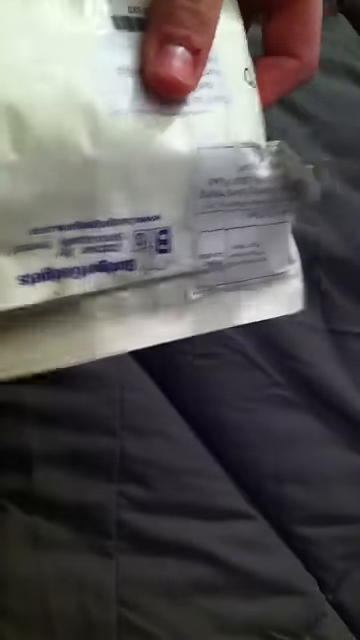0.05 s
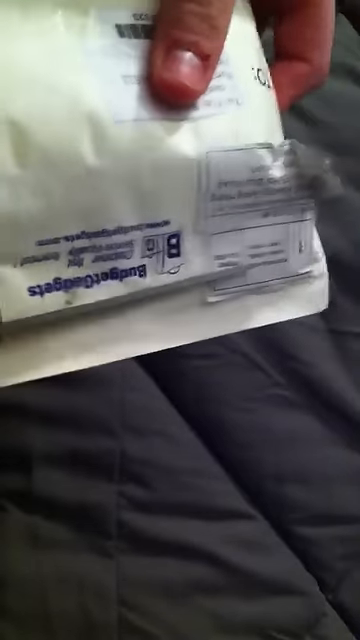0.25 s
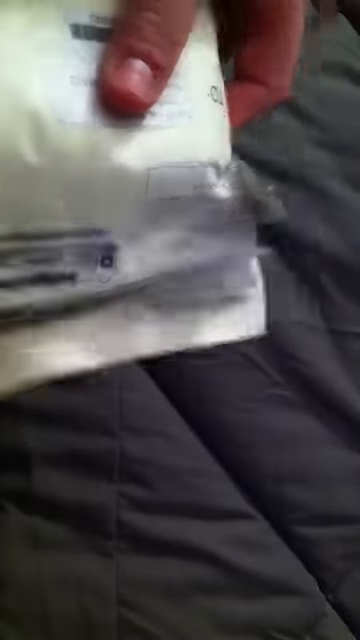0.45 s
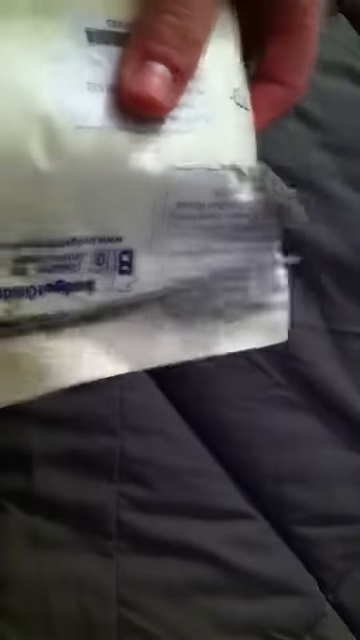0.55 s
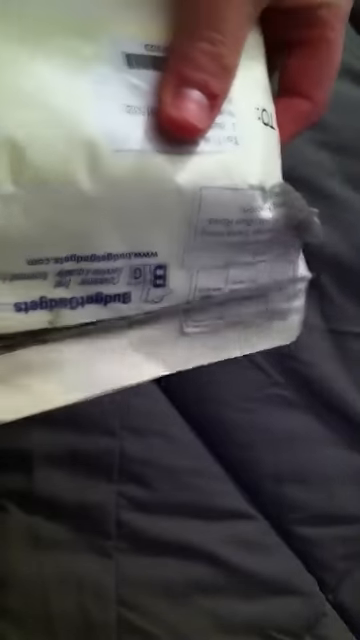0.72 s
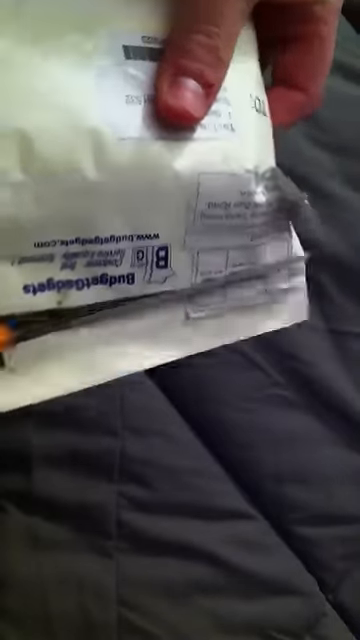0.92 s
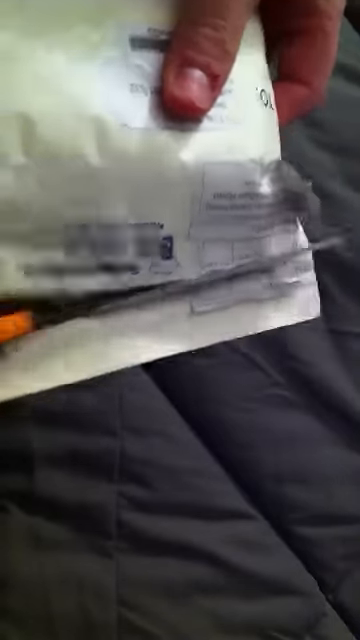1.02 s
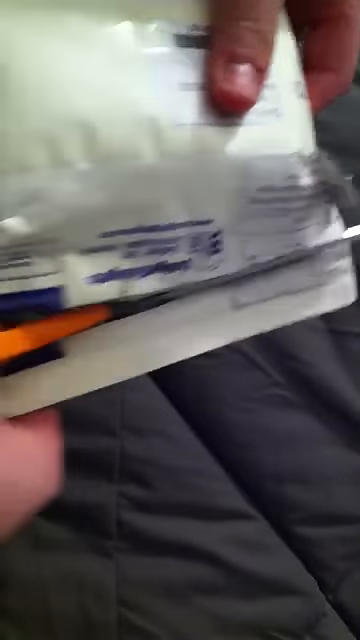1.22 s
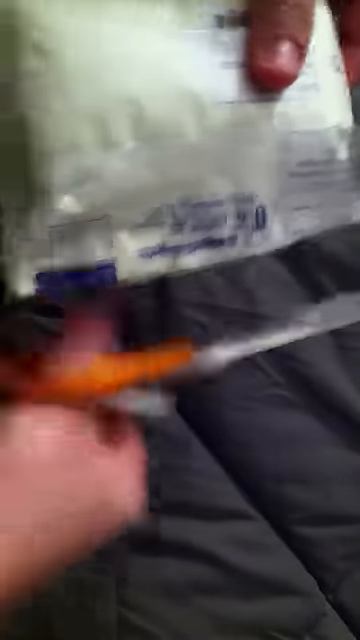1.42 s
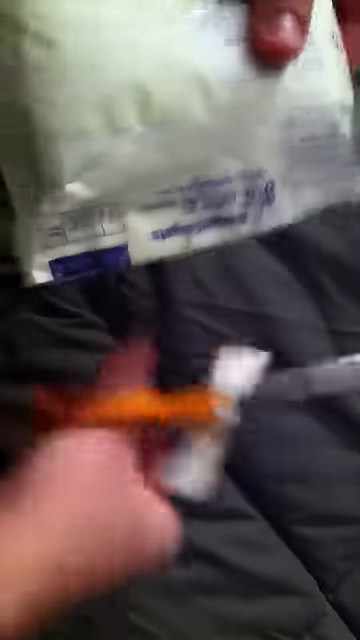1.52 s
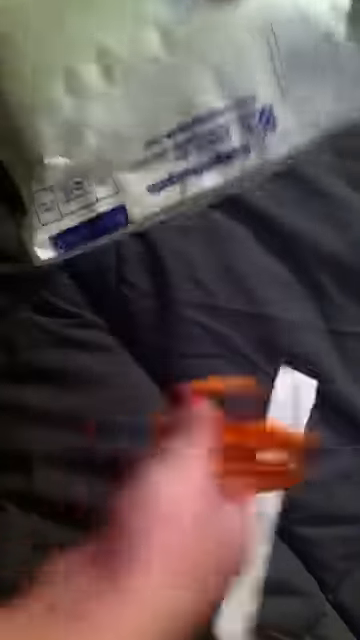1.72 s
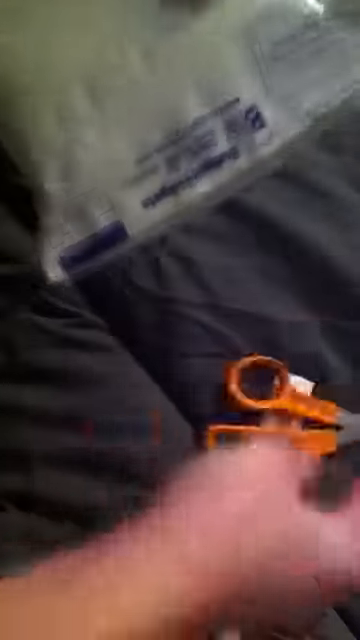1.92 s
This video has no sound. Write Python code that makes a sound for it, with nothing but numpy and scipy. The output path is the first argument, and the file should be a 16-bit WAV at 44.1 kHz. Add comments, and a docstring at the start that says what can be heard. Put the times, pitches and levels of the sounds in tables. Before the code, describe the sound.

Close crinkling of a padded envelope being handled and pulled open, with small sharp snaps.

```python
"""A padded paper and plastic envelope is handled close up, over a bed, and pulled open along one edge.
Creases buckle in quick avalanches of tiny fractures, single folds snap, and the sheet hisses as it
slides under the fingers. The hollow pouch thumps softly over a low rustle of hands and bedding.
A small furnished room adds a short tail; a faint hiss lies behind."""
import sys
import numpy as np
from scipy import signal
from scipy.fft import rfft, irfft
from scipy.io import wavfile

SR = 44100
rng = np.random.default_rng(int(sys.argv[2]) if len(sys.argv) > 2 else 0)


def transcribe(u):
    """Save the signal u as a 16-bit wav file named by the first command-line argument.

    u: samples, shape (n,) or (channels, n), limited to [-1, 1]; the rate is SR.
    q: integer samples, one column per channel.
    """
    v = np.clip(np.atleast_2d(u).T, -1, 1)
    q = np.round(v * 32767).astype(np.int16)
    wavfile.write(sys.argv[1], SR, q)


N = 85995
TOP_HZ = 15900


def undb(db):
    """Decibels to gain."""
    return 10 ** (np.asarray(db) / 20)


def unit(x):
    """Scale to unit energy."""
    return x / np.sqrt(np.sum(x ** 2) + 1e-18)


def colour(x, points, bass_db=0, treble_db=0, bass_hz=490, treble_hz=6200, size=2048):
    """Minimum-phase filter through (Hz, dB) points, with bass and treble shelves."""
    f = np.maximum(np.fft.rfftfreq(size, 1 / SR), 1)
    hz, db = np.array(points, float).T
    db = np.interp(np.log(f), np.log(hz), db)
    db = db + bass_db / (1 + (f / bass_hz) ** 4) + treble_db / (1 + (treble_hz / f) ** 4)
    cepstrum = irfft(np.log(undb(db)))
    cepstrum[1:size // 2] *= 2
    cepstrum[size // 2 + 1:] = 0
    return signal.fftconvolve(x, irfft(np.exp(rfft(cepstrum))))[:len(x)]


def steady(x, points, treble_db=0):
    """Colour, then scale to unit rms."""
    return unit(colour(x, points, treble_db=treble_db)) * np.sqrt(len(x))


def soften(x, hz):
    """Second-order low-pass."""
    return signal.sosfilt(signal.butter(2, min(hz, TOP_HZ), fs=SR, output="sos"), x)


def grains(n, per_s, spread_db, limit_sigma=1.73):
    """Random clicks of either sign and capped log-normal size."""
    size_db = spread_db * np.minimum(rng.standard_normal(n), limit_sigma)
    fires = rng.random(n) < per_s / SR
    return fires * np.sign(rng.standard_normal(n)) * undb(size_db)


def ring(hz, ring_s, size=4096):
    """A patch of sheet flips over and rings down."""
    t = np.arange(size) / SR
    displacement = np.exp(-t / max(ring_s, 1 / SR)) * np.sin(2 * np.pi * min(hz, TOP_HZ) * t)
    return np.diff(displacement, prepend=0)


def add(out, x, start_s, db, window_s=0.004):
    """Mix in one event; db is its rms with the energy spread over window_s."""
    i = max(int(round(start_s * SR)), 0)
    part = unit(x)[:max(N - i, 0)] * undb(db) * np.sqrt(window_s * SR)
    out[i:i + len(part)] += part


def background_hiss(rms_db=-66.5):
    """Faint, steady coloured noise."""
    # Each row: frequency in Hz, gain in dB.
    spectrum = [(30, -21), (150, 3.5), (400, -10.5), (1000, -7.5), (2500, -3.5), (4500, -4.5), (9000, -9),
                (16000, -12)]
    return undb(rms_db) * steady(rng.standard_normal(N), spectrum)


def room(x, send_db=-16.5, t60_s=0.22, delay_s=0.00373):
    """Short diffuse tail of a furnished bedroom."""
    # Each row: frequency in Hz, gain in dB.
    response = [(40, -9), (200, 1.5), (400, 7.5), (900, 1), (2000, 1), (4200, -2), (8000, 0.5),
                (16000, -13)]
    t = np.arange(SR // 2) / SR
    tail = rng.standard_normal(len(t)) * np.exp(-np.log(1000) * t / t60_s) * (t > delay_s)
    return undb(send_db) * colour(signal.fftconvolve(x, unit(tail))[:N], response)


def rustle():
    """Low, hollow rubbing of hands and bedding on the pouch."""
    # Each row: time in seconds, level in dB.
    contour = [(0, -63.5), (.12, -62), (.17, -67), (.3, -47.5), (.42, -75), (.52, -63), (.66, -58.5),
               (.75, -67), (.95, -71), (1.17, -62.5), (1.24, -63), (1.35, -60), (1.5, -62), (1.54, -65.5),
               (1.61, -64.5), (1.68, -73.5), (1.91, -70), (1.94, -53)]
    # Each row: frequency in Hz, gain in dB.
    pouch_response = [(30, -27), (90, -18), (160, -7.5), (250, -3), (380, 3), (560, -10.5), (1200, -12.5),
                      (4000, -39.5)]
    times_s, levels_db = np.array(contour).T
    gain = undb(np.interp(np.arange(N) / SR, times_s, levels_db))
    return gain * steady(rng.standard_normal(N), pouch_response)


def thumps(padding_hz=1300, lowest_hz=130):
    """Pops of the air-filled pouch, dulled by its padding; it is too small to radiate deep bass."""
    # Each row: start in seconds, level before the bass cut in dB, pitch in Hz, decay in seconds.
    pops = [(0.219, -45, 262, 0.0023), (0.5063, -35, 346, 0.0021), (.639, -43, 800, .005),
            (.739, -48.5, 189, 0.0046), (.846, -37, 340, .0035), (1.077, -51.5, 222, 0.0064),
            (1.3915, -30.5, 343, 0.003), (1.569, -51.5, 370, 0.013), (1.738, -38.5, 844, 0.001),
            (1.746, -52.5, 777, 0.013), (1.899, -58.5, 300, 0.0035)]
    out = np.zeros(N)
    for start_s, db, hz, ring_s in pops:
        add(out, soften(ring(hz, ring_s), padding_hz), start_s, db)
    return signal.sosfilt(signal.butter(2, lowest_hz, "high", fs=SR, output="sos"), out)


def slides(flicker_db=1.0, flicker_per_s=260):
    """Stick-slip grains swell and fade with each stroke and flicker as the surface catches."""
    # Each row: time of fastest slip in seconds, level in dB, rise and fall in seconds, treble in dB.
    strokes = [(.005, -58.5, .02, 0.025, -17), (0.062, -48.5, 0.015, 0.033, 7),
               (.113, -43.5, 0.033, 0.018, 4), (0.237, -46, 0.025, 0.029, -10),
               (0.331, -43, 0.011, 0.017, 2), (.477, -46, 0.014, 0.022, -1), (.516, -38, 0.0082, 0.034, 4),
               (.585, -34.5, 0.017, 0.02, 8.5), (.66, -45, 0.027, 0.036, -6.5),
               (.731, -38, 0.021, 0.015, 6), (0.791, -53, .02, 0.0088, 3), (0.873, -49, 0.021, 0.018, 9),
               (.988, -56, 0.015, 0.011, -3), (1.032, -47, 0.014, .018, -1.5), (1.07, -51, 0.022, 0.042, 0),
               (1.157, -42, 0.025, .019, 3.5), (1.31, -58.5, 0.044, 0.13, -2),
               (1.42, -47, 0.0071, 0.0052, -4), (1.388, -51.5, 0.0088, 0.0074, -2),
               (1.466, -50.5, 0.0046, 0.027, 2), (1.61, -65, 0.058, 0.056, 10),
               (1.695, -56, 0.013, 0.0089, 10), (1.779, -60.5, 0.037, 0.023, 6.5)]
    # Each row: frequency in Hz, gain in dB.
    friction_spectrum = [(35, -60.5), (60, -39), (330, -6), (553, -3.5), (607, -5.5), (803, 1.5),
                         (1220, -3.5), (1440, -0.5), (1820, -8.5), (2090, -1.5), (2580, -6.5), (4420, 0.5),
                         (5860, -9.5), (8710, -6), (12100, -13.5), (13600, -13), (16000, -21)]
    out, t = np.zeros(N), np.arange(N) / SR
    slips = grains(N, per_s=16000, spread_db=4)
    for peak_s, db, rise_s, fall_s, treble_db in strokes:
        speed = np.exp(-0.5 * ((t - peak_s) / np.where(t < peak_s, rise_s, fall_s)) ** 2)
        friction = steady(np.roll(slips, rng.integers(N)), friction_spectrum, treble_db)
        out += undb(db) * speed * friction
    catches = np.interp(t * flicker_per_s, np.arange(N), rng.standard_normal(N))
    return out * undb(flicker_db * catches)


def snaps(shiver_db=-6.5, shiver_s=0.0019, cutoff_ratio=2.2, size=4096):
    """A single fold flips sharply, then the sheet shivers briefly."""
    # Each row: start in seconds, level in dB, pitch in Hz, decay in seconds.
    folds = [(.1478, -51.5, 8000, .0001), (.151, -42, 1500, 0.00023), (0.214, -43, 5470, 0.00014),
             (0.2443, -30.5, 2800, 0.000063), (0.2834, -26, 5230, 0.00015), (0.2998, -18, 4200, 0.00031),
             (0.433, -55.5, 5500, 0.00007), (.6381, -28, 2220, 0.00012), (.669, -34.5, 3400, 0.00011),
             (0.6724, -38.5, 5500, 0.000046), (0.7354, -34, 3080, 0.00012), (0.8253, -20.5, 1180, 0.00076),
             (.849, -26, 2050, 0.00018), (1.3248, -45.5, 1650, 0.00033), (1.4452, -28, 3820, 0.00087),
             (1.4544, -20.5, 4200, 0.000075), (1.482, -37, 10700, 0.00015)]
    out, t = np.zeros(N), np.arange(size) / SR
    for start_s, db, hz, ring_s in folds:
        push = undb(shiver_db) * unit(rng.standard_normal(size) * t * np.exp(-2 * t / shiver_s))
        push[0] += 1  # the flip
        snap = signal.fftconvolve(push, ring(hz, ring_s))[:size]
        add(out, soften(snap, cutoff_ratio * hz), start_s, db)
    return out


def crumples(size=4096):
    """Each crease gives way in an avalanche of fractures that builds up and dies away."""
    # Each row: peak time in seconds, level in dB, rise and fall in seconds, bass and treble in dB.
    creases = [(0.0515, -41.5, 0.00092, 0.0015, -11, 15.5), (.119, -37, 0.0016, 0.0021, 8, 7.5),
               (.2158, -39, 0.0021, 0.0022, 10, 4), (0.2433, -18, 0.0003, 0.0033, -4, -1),
               (.2518, -23, 0.006, .003, -7, 1), (0.256, -20.5, 0.00044, 0.0025, -3, -1),
               (.261, -24, .001, 0.0017, 3, 0.5), (.27, -22.5, 0.0063, 0.011, 1, 0),
               (0.279, -23, .0025, 0.0012, 12, 13), (0.2828, -16.5, 0.00035, 0.0006, -3, 1.5),
               (0.2858, -18.5, 0.00086, 0.00176, -5, 2), (.3006, -17, 0.0022, 0.003, 5.5, -0.5),
               (.3033, -24.5, 0.00023, 0.0033, 7, 10.5), (0.3074, -28, 0.0012, 0.0011, -8, 2),
               (0.3382, -33, 0.0014, 0.0013, 0, 3), (0.4473, -48, 0.0011, 0.0052, 8, -17),
               (0.5041, -25.5, 0.00068, 0.0049, -0.5, 10), (.7387, -38.5, 0.0011, 0.0034, 25, 14),
               (0.7659, -38, .002, 0.0032, 10, 5.5), (0.819, -30, 0.00086, 0.0037, 0, -3),
               (0.8252, -20, 0.0028, 0.0048, 5.5, 10.5), (.8325, -29, 0.0024, 0.0028, -12, 11),
               (0.8429, -26, 0.00047, 0.001, 13, 10), (0.848, -20.5, 0.0026, 0.0018, -5.5, -7.5),
               (0.8492, -21.5, 0.0021, 0.00096, 2.5, 4.5), (.859, -35.5, 0.0026, 0.002, 18, 7),
               (1.158, -37.5, .003, 0.0029, 11, 15), (1.1944, -52.5, 0.00042, 0.0011, 13, -11),
               (1.3917, -28.5, 0.0018, 0.0017, 0.5, -1), (1.394, -29.5, 0.00047, 0.0033, 10.5, 1),
               (1.4051, -35.5, 0.0015, 0.0021, 15, 5.5), (1.446, -32, 0.0025, 0.0011, 5, 10),
               (1.45, -31.5, 0.0012, 0.0016, 12, 7.5), (1.456, -38.5, 0.0011, 0.001, 21, -11),
               (1.705, -50.5, 0.0026, 0.0026, 6, 9.5), (1.852, -53.5, 0.0011, 0.0049, 10, -1),
               (1.9485, -36, 0.0057, 0.0033, 8, 4.5)]
    # Each row: frequency in Hz, gain in dB.
    paper_response = [(30, -20), (110, -25.5), (230, -6.5), (400, 0.5), (560, -6), (800, 1.5), (1300, -0.5),
                      (2000, -0.5), (2400, -4), (3000, -2), (4300, -1.5), (5300, -6), (6000, -10),
                      (7500, -15), (8700, -9), (10500, -12.5), (12000, -21), (14000, -16.5), (16000, -24)]
    out = np.zeros(N)
    t = (np.arange(size) - size // 4) / SR  # zero at the peak
    for peak_s, db, rise_s, fall_s, bass_db, treble_db in creases:
        strength = np.exp(-np.abs(t / np.where(t < 0, rise_s, fall_s)))
        avalanche = strength * grains(size, per_s=8000, spread_db=5.5)
        add(out, colour(avalanche, paper_response, bass_db, treble_db), peak_s + t[0], db)
    return out


def scene():
    """The handled envelope, its room tail and the hiss, in mono."""
    handling = crumples() + snaps() + thumps() + slides() + rustle()
    return (handling + room(handling) + background_hiss())[None]


def record(dry):
    """Steep low-pass at TOP_HZ."""
    return signal.sosfilt(signal.ellip(10, 0.1, 80, TOP_HZ, fs=SR, output="sos"), dry)


dry = scene()
out = record(dry)
transcribe(out)
```